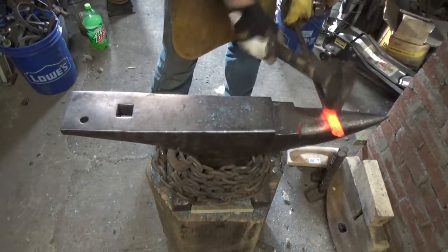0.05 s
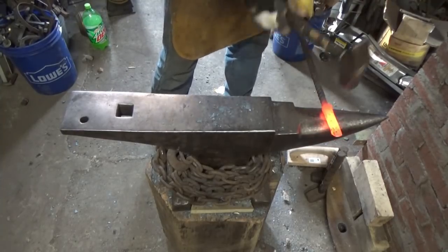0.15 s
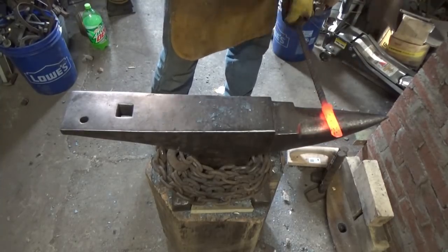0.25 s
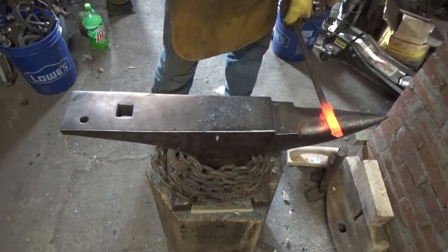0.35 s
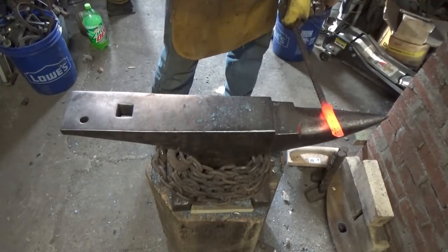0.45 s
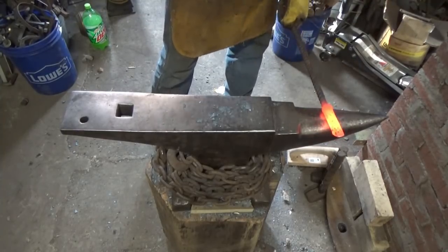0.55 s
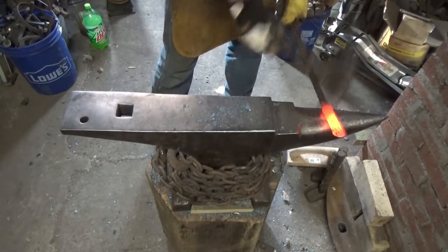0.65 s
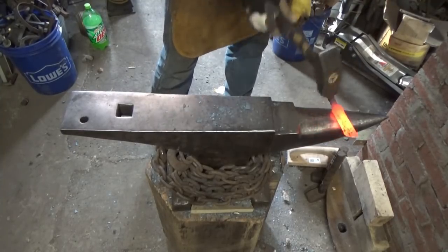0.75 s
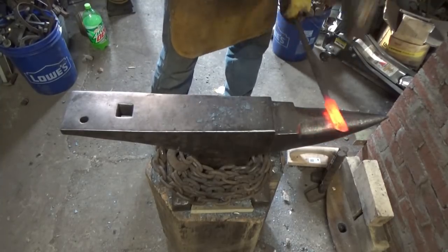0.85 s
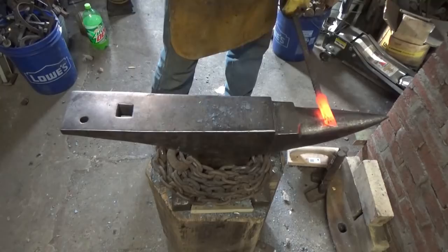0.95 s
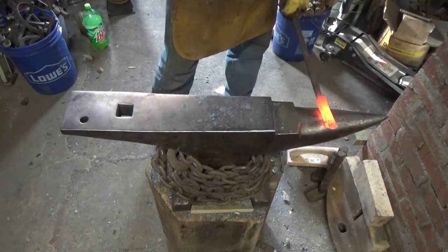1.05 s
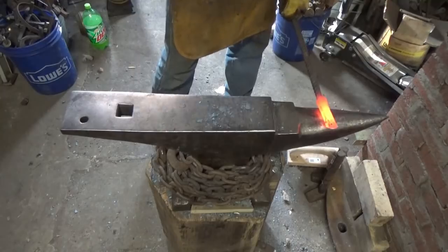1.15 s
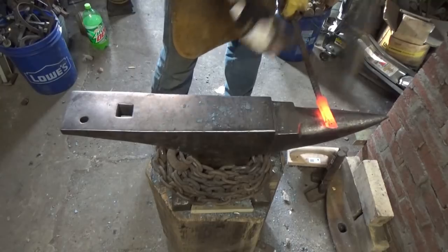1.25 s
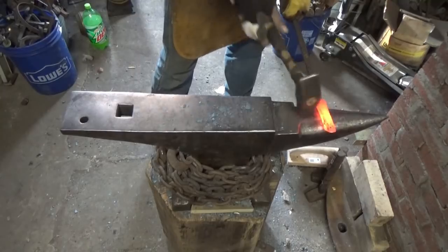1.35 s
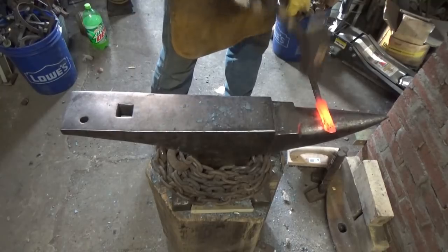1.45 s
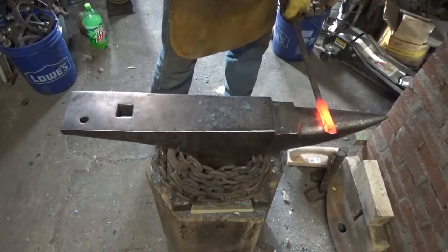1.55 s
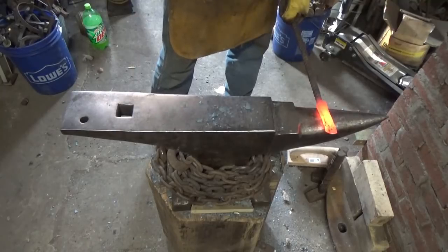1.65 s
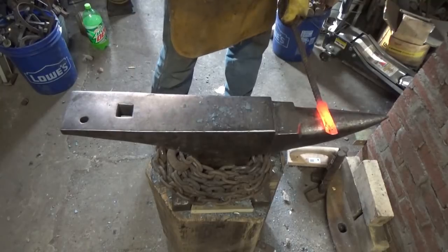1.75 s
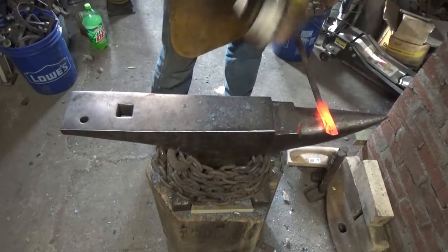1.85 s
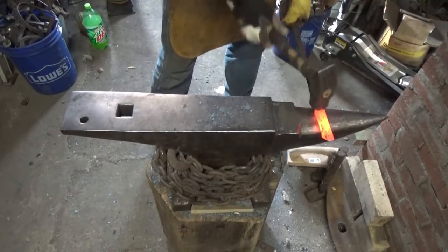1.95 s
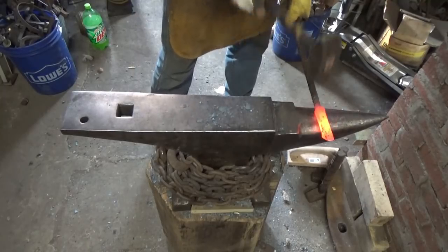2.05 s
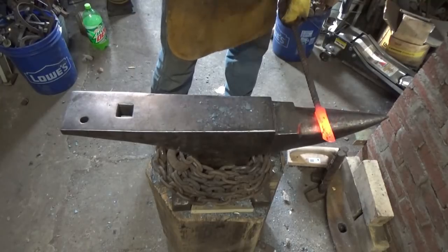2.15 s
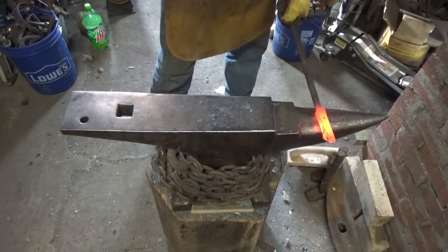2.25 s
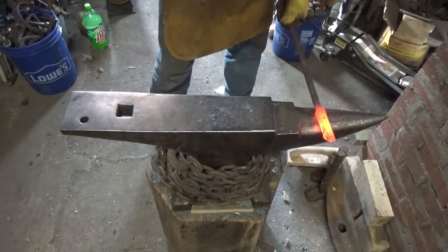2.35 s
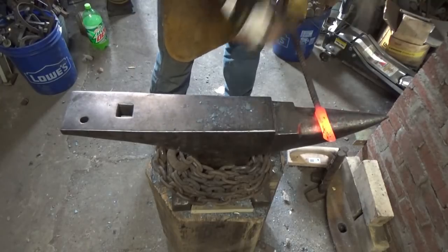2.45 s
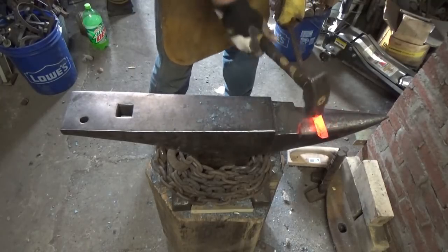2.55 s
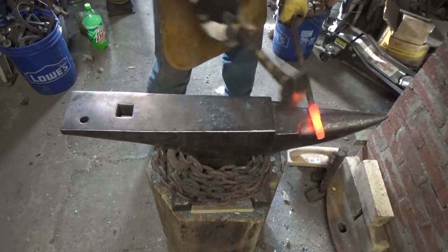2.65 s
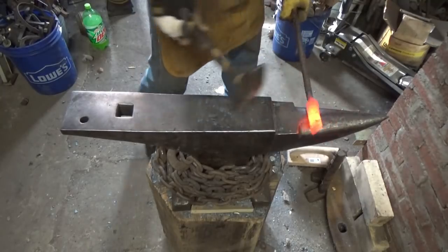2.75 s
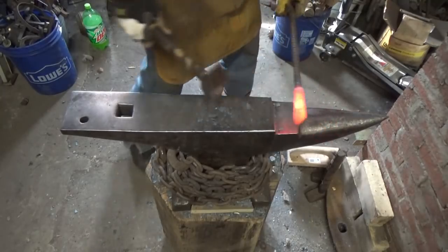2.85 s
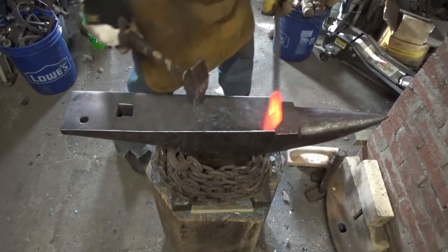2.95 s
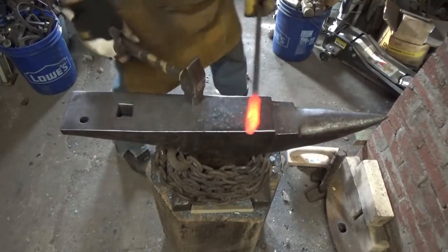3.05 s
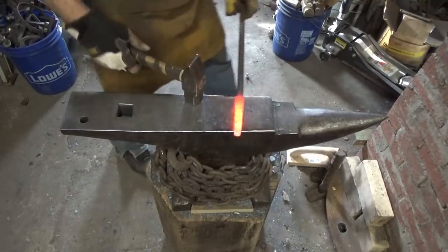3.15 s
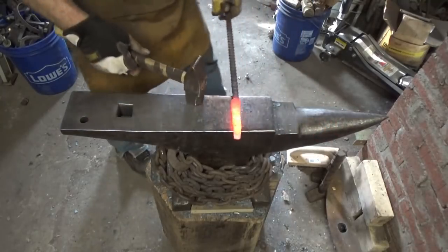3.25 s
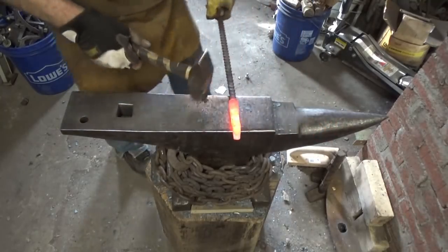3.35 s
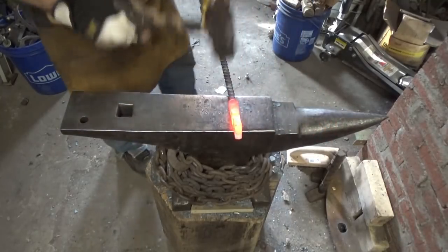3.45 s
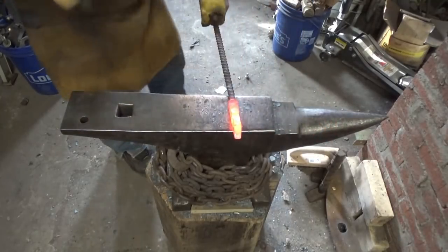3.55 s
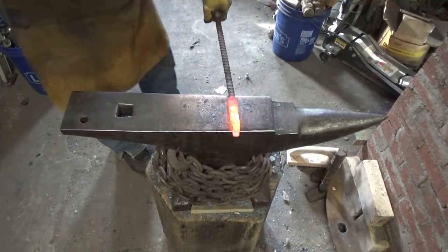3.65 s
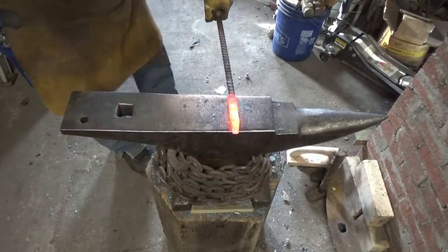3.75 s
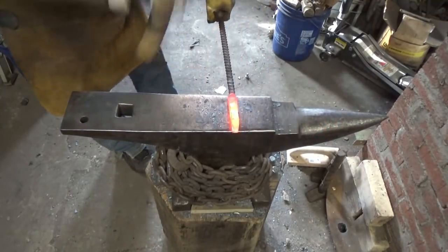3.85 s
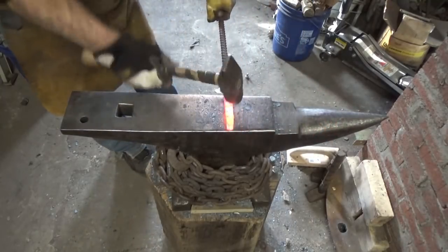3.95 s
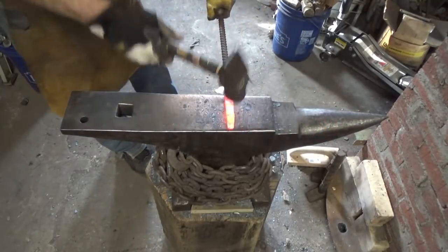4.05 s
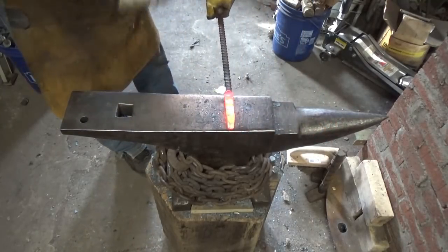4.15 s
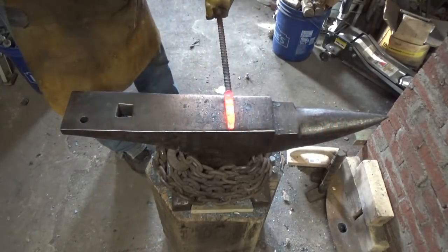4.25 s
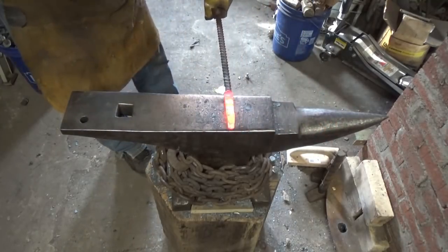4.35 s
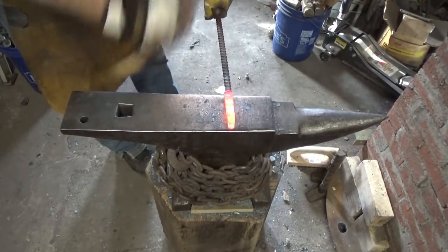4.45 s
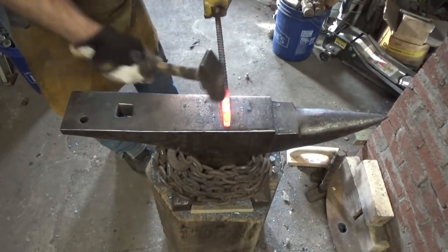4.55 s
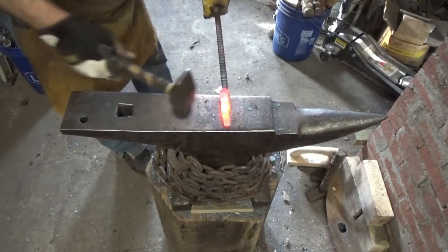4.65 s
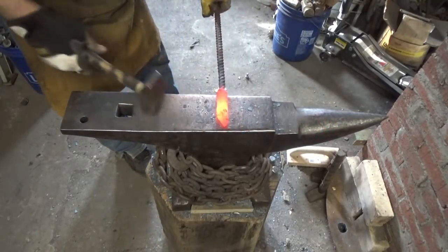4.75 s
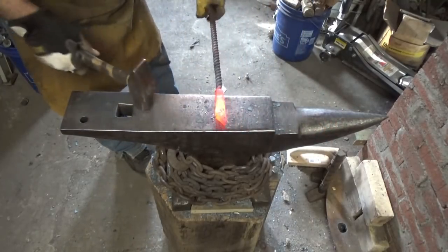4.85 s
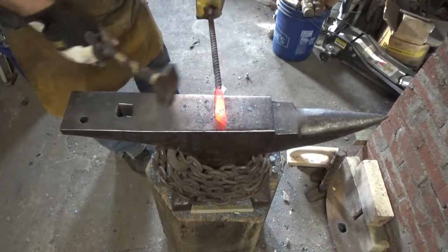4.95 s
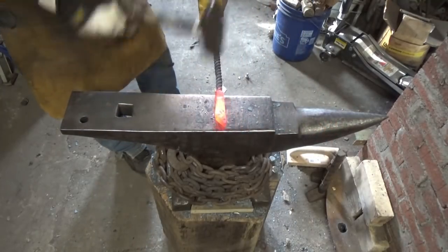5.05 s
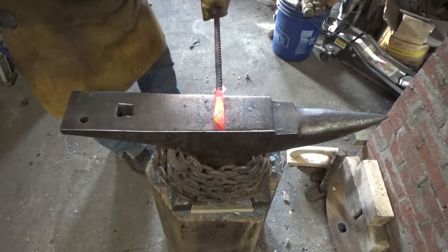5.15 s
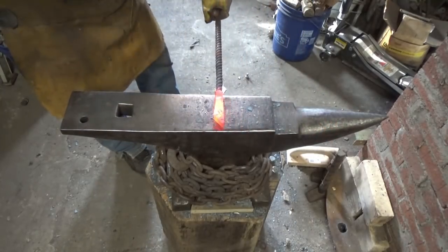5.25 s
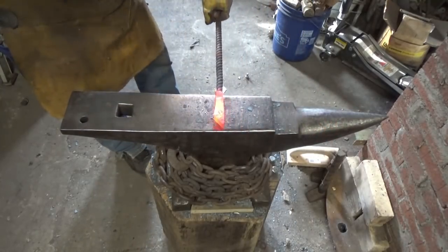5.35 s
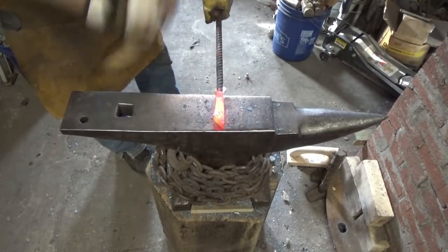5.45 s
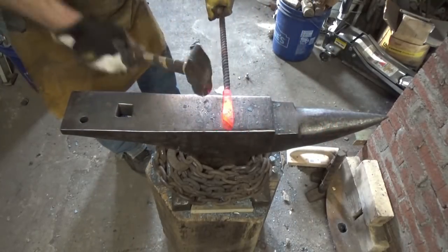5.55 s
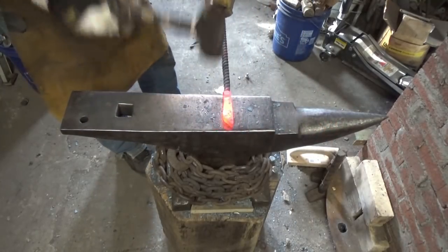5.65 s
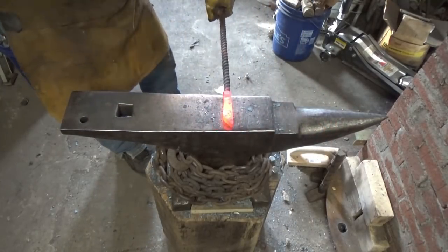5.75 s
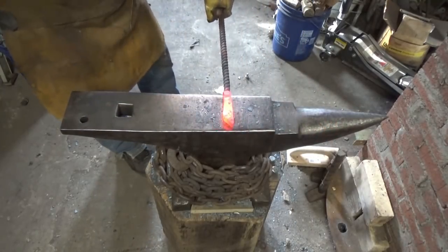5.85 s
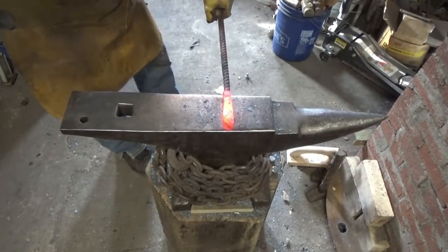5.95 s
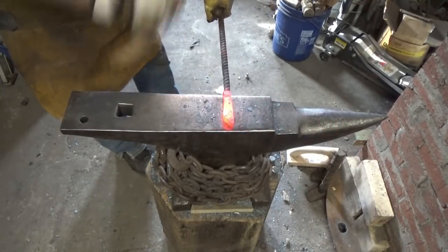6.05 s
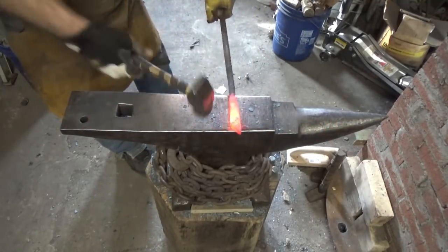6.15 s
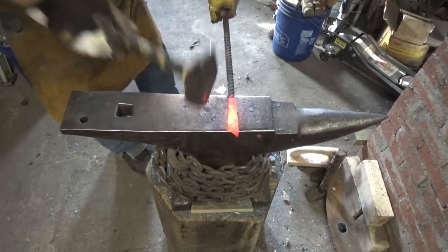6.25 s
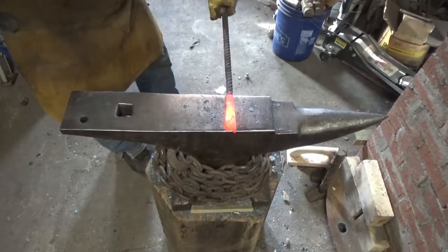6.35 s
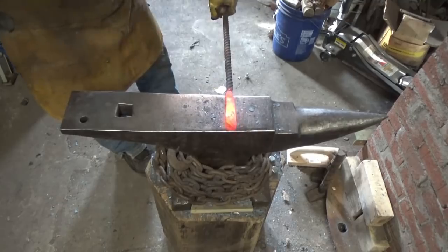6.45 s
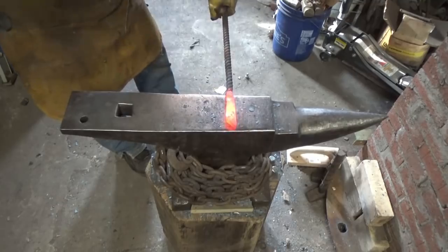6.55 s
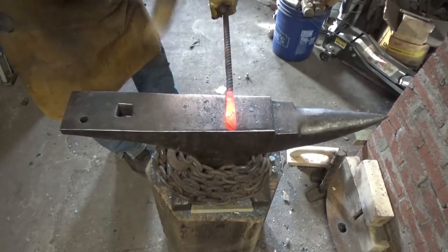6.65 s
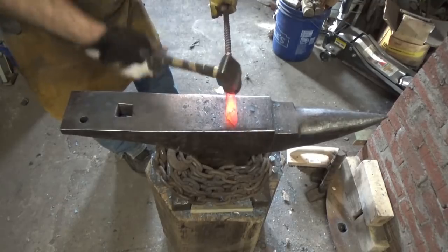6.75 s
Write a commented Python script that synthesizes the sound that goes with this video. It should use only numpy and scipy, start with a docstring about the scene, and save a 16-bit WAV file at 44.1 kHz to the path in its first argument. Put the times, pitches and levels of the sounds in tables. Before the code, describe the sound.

In a softly rushing workshop, a hammer lands five heavy blows on a hot bar, about 0.6 seconds apart, each a hard crack and short anvil ring. The hammer bounces lightly on the bare anvil, the bar clinks down and scrapes, then five more blows follow with another bounce among them. Close stereo microphone, short room reverberation, loud hits compressed.

```python
"""In a softly rushing workshop a smith strikes a hot bar six times on the anvil's horn, then four times on its face.
Each blow is a noise crack, a cluster of short steel modes and the anvil's damped modes; faint scale ticks are bursts.
After the fifth and seventh blows the hammer bounces on the bare face: clicks that excite the modes of anvil and head.
After the first bounces the bar is set down (ringing modes) and dragged (rough noise through resonances).
Decaying noise is the room's reverberation; a limiter ducks the loud sounds and lets the ring swell back."""
import sys
import numpy as np
from scipy import signal
from scipy.fft import rfft, irfft, next_fast_len
from scipy.io import wavfile
from scipy.ndimage import uniform_filter1d

SR = 44100
rng = np.random.default_rng(int(sys.argv[2]) if len(sys.argv) > 2 else 0)


def materialize(psi):
    """Save the field psi as 16-bit PCM at rate SR to the path in sys.argv[1].

    A 1-D psi becomes a single channel; in a 2-D psi each row is a channel.
    """
    bounded = np.clip(np.atleast_2d(psi).T, -1, 1)
    quanta = np.round(bounded * 32767).astype(np.int16)
    wavfile.write(sys.argv[1], SR, quanta)


N = 300479
T = np.arange(SR) / SR  # the second that follows a contact

# The anvil's mode frequencies in Hz; close neighbours beat against each other.
ANVIL_MODE_HZ = [1036, 1044, 1053, 1466, 1473, 1491, 1523, 2573, 2619, 3381, 3407, 4603, 4959, 5048, 5812,
                 6153, 6320, 6665, 7108, 7675, 7886, 7951, 8782, 9462, 10034, 10411, 11060, 11840, 14104]
# The anvil's modes in the same order. Each row: t60 in seconds, level in dB struck on the horn,
# level in dB struck on the face, level in dB under a light bounce.
ANVIL_MODES = [(0.19, -4, -7, -20.5), (0.24, 2, 3.5, 8), (0.41, -9.5, -10.5, -23.5), (0.42, -8.5, -19, -12),
               (0.6, -19, -23, -24), (0.42, -9.5, -20, -34.5), (0.58, -18, -31, -36), (.4, -27, -32.5, -22),
               (0.21, -16, -6.5, -30.5), (0.44, -31.5, -23, -22), (0.29, -29, -19.5, -23),
               (0.23, -30.5, -28.5, -36), (0.086, -7.5, -26, -7.5), (0.57, -16, -20, -5.5),
               (0.069, -26, -17.5, -12.5), (0.11, -29.5, -21, -32), (0.36, -27.5, -25, -20.5),
               (0.23, -17.5, -18.5, -15), (0.11, -28.5, -26, -39), (0.23, -29, -16.5, -13.5),
               (0.24, -29, -17.5, -26), (0.29, -20.5, -10.5, -15.5), (0.34, -20.5, -16, -19.5),
               (0.33, -22, -14.5, -35.5), (0.54, -28, -27.5, -27.5), (0.66, -27.5, -25, -35.5),
               (0.27, -30, -35, -32.5), (0.15, -33.5, -26.5, -28), (1.2, -54, -49.5, -55)]
# Spectrum of a light click of steel on steel. Each row: frequency in Hz, density in dB.
CLICK_COLOUR = [(60, -28), (230, 5), (800, -4), (1600, 5), (3300, 4.5), (5200, -2), (6500, -10.5),
                (10000, -6.5), (12500, -26.5), (16000, -47.5)]


def amp(db):
    """Level to amplitude ratio: 20 dB is a factor of ten."""
    return 10 ** (np.asarray(db) / 20)


def unit(x):
    """Normalisation to a root-mean-square value of 1."""
    return x / np.sqrt(np.mean(x ** 2) + 1e-20)


def along(points, hz):
    """Linear interpolation of (Hz, value) points over a logarithmic frequency axis."""
    f, v = np.transpose(points)
    return np.interp(np.log(hz + 1), np.log(f + 1), v)


def filtered(x, response):
    """Linear filtering: the spectrum is multiplied by a response of frequency."""
    n = x.shape[-1]
    padded = next_fast_len(n + SR // 8)
    spectrum = rfft(x, padded) * response(np.fft.rfftfreq(padded, 1 / SR))
    return irfft(spectrum, padded)[..., :n]


def noise(colour, size):
    """Coloured noise: white noise shaped to a given spectrum, at rms 1."""
    return unit(filtered(rng.standard_normal(size), lambda hz: amp(along(colour, hz))))


def stereo(mid, side):
    """Diffuse-field coherence: two close microphones differ little in the bass."""
    # Each row: frequency in Hz, gain of the side signal in dB.
    width = [(100, -21.5), (250, -19), (600, -10.5), (1500, -7), (4000, -9.5), (9000, -8), (12000, -34.5)]
    side = filtered(side, lambda hz: amp(along(width, hz)))
    return np.array([mid + side, mid - side])


def shop(level_db=-57.5, rise_db_per_s=0.5):
    """Stationary coloured noise, the workshop's low rush, under a slowly growing gain."""
    # Spectrum of the rush. Each row: frequency in Hz, density in dB.
    rush_colour = [(12, -51.5), (20, -47), (44, -5.5), (171, -1), (202, -1), (282, -0.5), (382, -5),
                   (505, -2), (811, -6.5), (1500, -8), (1670, -15), (5850, -26.5), (11000, -30.5),
                   (15500, -46.5)]
    rush = stereo(noise(rush_colour, N), noise(rush_colour, N))
    return rush * amp(level_db + rise_db_per_s * np.arange(N) / SR)


def add(track, s, sound):
    """Superposition: a sound is mixed into the track from time s."""
    part = track[:, round(s * SR):][:, :sound.shape[-1]]
    part += sound[..., :part.shape[-1]]


def decay(t, t60):
    """Exponential decay, falling by 60 dB in t60 seconds."""
    return np.exp(-np.log(1000) * t / t60)


def ring(hz, t60, db):
    """Modal superposition: damped sines start at once, neighbours swinging in opposite directions."""
    hz, t60 = np.array(hz)[:, None], np.array(t60)[:, None]
    swing = amp(db) * (-1) ** np.arange(len(hz))
    return swing @ (decay(T, t60) * np.sin(2 * np.pi * hz * T))


def burst(colour, t60, rise_s=0.0013):
    """Impact noise: broadband energy rises rapidly and decays exponentially."""
    return noise(colour, SR) * decay(T, t60) * (1 - np.exp(-T / rise_s))


def room_tail(build_s=0.015):
    """Diffuse reverberation: noise builds up as the walls reply, then decays faster in the high treble."""
    # The room's absorption. Each row: frequency in Hz, t60 in seconds.
    room_t60 = [(60, 0.46), (150, 0.5), (500, 0.51), (1500, 0.43), (3500, 0.4), (7000, 0.31), (10000, 0.33),
                (15000, 0.039)]
    hz, t, z = signal.stft(rng.standard_normal((2, SR)), SR, nperseg=256)
    faded = z * decay(t, along(room_t60, hz)[:, None])
    tail = signal.istft(faded, SR, nperseg=256)[1][:, :SR]
    tail = tail * (1 - np.exp(-T / build_s))
    return stereo(*tail) / np.linalg.norm(tail[0])  # mid signal of energy 1


def in_room(x, wet_db):
    """Direct sound plus its convolution with the room's impulse response."""
    reverberation = signal.fftconvolve(x[None], room_tail(), axes=1)[:, :SR]
    return x + amp(wet_db) * reverberation


def contact(colour, t60, wet_db):
    """Impact noise with its diffuse field: a short burst and a room wash of the same colour."""
    direct = burst(colour, t60)
    wash = filtered(room_tail(), lambda hz: amp(along(colour, hz)))
    return direct + amp(wet_db) * wash * np.linalg.norm(direct) / np.linalg.norm(wash[0])


def tilted(colour, above_hz, db):
    """Spectral tilt: the points of a colour above a frequency shift in level."""
    return [(f, level + db * (f > above_hz)) for f, level in colour]


def clang(low_hz=1600, high_hz=10500, t60=0.054, spread_db=3, count=44):
    """Dense modal response: random short modes swell while the surfaces press together."""
    hz = rng.uniform(low_hz, high_hz, count)
    life = t60 * rng.uniform(0.5, 1.5, count)
    levels = spread_db * rng.standard_normal(count)
    press = 1 - np.exp(-T / 0.002)
    return press * ring(hz, life, levels) / np.linalg.norm(amp(levels))


def blows(ring_db=-1, crack_db=-1, clang_db=0, crack_t60=0.05, crack_wet_db=0, scatter_db=1,
          left_db=0.5, lean_db=-3, lean_scatter_db=2):
    """Modal excitation: a heavy blow cracks, clangs and rings the modes that its place favours."""
    # Each row: start in seconds, force in dB, place (face above 0.5, else horn), crack in dB,
    # impact treble in dB, then four ring levels in dB, one near each of ring_hz.
    blow_rows = [(0.1383, 1.5, -6.5, -1.5, 1.5, -2.5, -8.5, -3.5, -7),
                 (0.75, -2, -6.5, 0.95, 0, -15.5, -2, -0.5, -5),
                 (1.3598, -1.5, 0, -1, -4.5, -1, -2, -3, -1.5),
                 (1.9761, -0.5, 0.5, -2.3, -4, 2.5, -2.5, -9.5, -9),
                 (2.5784, -1.5, 0, 0, 0, 6.5, 5.5, -3, 7.5),
                 (4.0135, -5.5, 0, 3.1, 1.5, 9, -0.5, -8.5, 2.5),
                 (4.5890, -5, 1, 4.5, 4.5, -2.5, 2.5, 6.5, 7),
                 (5.5890, -3, 1, -0.62, 0, 5.5, 8.5, -5, -10.5), (6.1910, -4, 1, 1, -1, -22, 0.5, 2.5, 4),
                 (6.8110, -14.5, 1, 2, 0.5, -6, 6.5, 8, 2.5)]
    # Centres of the four ring levels in Hz.
    ring_hz = [3400, 5049, 7951, 10411]
    # Spectrum of the crack. Each row: frequency in Hz, density in dB.
    crack_colour = [(25, -20), (80, -11), (140, -1), (300, -3.5), (700, -1), (1700, 1), (3000, -1.5),
                    (4300, -3.5), (6500, -3), (9500, -8.5), (11000, -11), (13000, -16.5), (16000, -28.5)]
    out = np.zeros((2, N))
    hz = np.array(ANVIL_MODE_HZ)
    t60, horn_db, face_db, _ = np.transpose(ANVIL_MODES)
    for s, force_db, place, sharp_db, treble_db, *colour_db in blow_rows:
        place_db = face_db if place > 0.5 else horn_db
        levels = place_db + np.interp(hz, ring_hz, colour_db) * (hz > 3000)
        levels = levels + scatter_db * rng.standard_normal(len(hz))
        tones = in_room(ring(hz, t60, levels), wet_db=-17)

        # each mode radiates its own pattern, so it reaches the two microphones unequally
        lean_levels = levels + lean_db + lean_scatter_db * rng.standard_normal(len(hz))
        lean = ring(hz, t60, lean_levels)
        quarter_turned = np.imag(signal.hilbert(lean, 2 * SR))[:SR]
        tones = tones + stereo(0, quarter_turned)
        tones = tones * amp([[left_db], [-left_db]])

        crack = contact(tilted(crack_colour, 3600, treble_db), crack_t60, crack_wet_db)
        cluster = in_room(clang(), wet_db=-7.5)
        impact = amp(crack_db) * crack + amp(clang_db + treble_db) * cluster
        add(out, s, amp(force_db + ring_db) * tones + amp(force_db + sharp_db) * impact)
    return out


def scale_ticks(level_db=7):
    """Impulsive radiation: tiny bright noise bursts, as of cooling scale flaking off."""
    # Each row: start in seconds, relative level in dB.
    tick_rows = [(1.147, -35.5), (1.1948, -39), (1.275, -53.5), (2.3207, -39.5), (5.4152, -32),
                 (5.5404, -41), (6.0494, -53)]
    # Spectrum of a tick. Each row: frequency in Hz, density in dB.
    flake_colour = [(1000, -9.5), (4000, -3.5), (10000, 13.5), (16000, -13)]
    out = np.zeros((2, N))
    for s, db in tick_rows:
        tick = in_room(burst(flake_colour, t60=0.0022), wet_db=-10.5)
        add(out, s, amp(db + level_db) * tick)
    return out


def bounces(click_db=-11, anvil_db=-22, head_db=-19, damping=0.63):
    """Modal damping: a bounce clicks and rings head and anvil, whose low modes the contacts cut short."""
    # Each row: start in seconds, click in dB, low anvil ring in dB, hammer head ring in dB,
    # click treble in dB.
    bounce_rows = [(2.8553, -4.5, -6, -14.5, 3), (2.9281, -6.5, -8, -31.5, -4),
                   (2.9819, -9.5, -13.5, -29.5, -5), (3.0220, -13.5, -14.5, -41, -1),
                   (4.8414, -2, -13.5, 5, -3), (4.9160, -1, -8, 3.5, 3), (4.9626, -2.5, -18, -3, -0.5),
                   (5.0085, -8.5, -23.5, -6, -9)]
    # The head's mode frequencies in Hz.
    head_hz = [2300, 2588, 2612, 4850, 5190, 8750]
    # The head's modes in the same order. Each row: t60 in seconds, level in dB.
    head_modes = [(.1, -20.5), (0.25, -8), (0.063, 10.5), (0.14, -9.5), (0.12, -11), (0.15, -19.5)]
    out = np.zeros((2, N))
    low = np.array(ANVIL_MODE_HZ) < 4000
    t60, _, _, light_db = np.transpose(ANVIL_MODES)
    t60 = t60 * np.where(low, damping, 1)
    for s, db, body_db, ping_db, treble_db in bounce_rows:
        click = contact(tilted(CLICK_COLOUR, 6000, treble_db), t60=0.041, wet_db=-6.5)
        # the high modes follow the click; the low ones depend on where the hammer lands
        levels = light_db + np.where(low, body_db, db - 4.5)
        body = amp(anvil_db) * ring(ANVIL_MODE_HZ, t60, levels)
        ping = amp(head_db + ping_db) * ring(head_hz, *np.transpose(head_modes))
        tones = in_room(body + ping, wet_db=-11)
        add(out, s, amp(click_db + db) * click + tones)
    return out


def bar_knocks(ring_db=-33, clang_db=-27, click_db=-29):
    """Modes of a struck bar: it is set down, trips as it slides, or jumps under a blow and falls back."""
    # Each row: start in seconds, relative level in dB.
    knock_rows = [(3.0854, 0), (3.157, -8), (3.2189, -8.5), (3.3744, -7.5), (3.533, -11), (6.2490, 13)]
    # Modes of the bar's cold shank. Each row: frequency in Hz, t60 in seconds, level in dB.
    bar_modes = [(1314, .2, -11), (2110, .13, 0), (2929, .13, -4), (3957, .13, -5), (4640, .1, -9),
                 (6901, .15, -20)]
    out = np.zeros((2, N))
    for s, db in knock_rows:
        cluster = clang(low_hz=3600, high_hz=6500, t60=0.075, count=14)
        tones = amp(ring_db) * ring(*np.transpose(bar_modes)) + amp(clang_db) * cluster
        click = contact(CLICK_COLOUR, t60=0.06, wet_db=-6)
        add(out, s, amp(db) * (in_room(tones, wet_db=-14.5) + amp(click_db) * click))
    return out


def stroke(start, length, attack_s=0.057, sag_db_per_s=13, release_db_per_s=148.5):
    """Sliding envelope: a stroke gathers speed, eases off and stops."""
    age = np.maximum(np.arange(N) / SR - start, 0)
    fade_db = sag_db_per_s * age + release_db_per_s * np.maximum(age - length, 0)
    return np.minimum(age / attack_s, 1) * amp(-fade_db)


def drag(grit_db=2, grit_rate_hz=220, modes_db=-2):
    """Friction excitation: rough scale catches and slips on the face, driving narrow steel resonances."""
    # Each row: start in seconds, length in seconds, pressure in dB.
    slide_rows = [(3.134, .07, -41.5), (3.2, .06, -41), (3.324, .35, -37), (3.73, 0.21, -60),
                  (3.951, 0.12, -42)]
    # Spectrum of the rubbing. Each row: frequency in Hz, density in dB.
    rub_colour = [(88, -27.5), (150, -32.5), (169, 5), (205, -8), (326, 2.5), (631, -3), (695, 3),
                  (844, 5.5), (966, 4), (2100, 0.5), (2410, -3), (7860, -9), (15500, -32)]
    # Resonances of the steel. Each row: frequency in Hz, width in Hz, relative gain in dB.
    slide_modes = [(787, 660, -17), (3264, 39, 4), (4630, 51, -3.5), (4800, 29, 2), (5500, 68, -10),
                   (6700, 56, -32)]

    def steel(f):
        """Resonance: direct transmission plus a band-pass peak for each mode."""
        peaks = sum(amp(gain_db) * 1j * f * width / (centre ** 2 - f ** 2 + 1j * f * width)
                    for centre, width, gain_db in slide_modes)
        return 1 + amp(modes_db) * peaks

    t = np.arange(N) / SR
    roughness = np.interp(t * grit_rate_hz, np.arange(N), rng.standard_normal(N))
    catches = amp(grit_db * roughness)
    rub = [unit(filtered(catches * noise(rub_colour, N), steel)) for _ in range(2)]
    pressure = sum(amp(db) * stroke(s, length) for s, length, db in slide_rows)
    return stereo(*rub) * pressure


def scene():
    """Superposition of all the sources in the workshop."""
    return shop() + blows() + scale_ticks() + bounces() + bar_knocks() + drag()


def limiter(x, ceiling_db=-13.0, release_db_per_s=170, attack_s=0.0013):
    """Gain control: the gain ducks quickly under a loud sound, then climbs at a steady rate in dB."""
    power = np.abs(uniform_filter1d(np.mean(x ** 2, axis=0), size=128))
    over_db = np.maximum(10 * np.log10(power + 1e-12) - ceiling_db, 0)
    # the running maximum holds the deepest duck while the climb pays it back
    climb_db = release_db_per_s * np.arange(N) / SR
    gain_db = climb_db - np.maximum.accumulate(over_db + climb_db)
    keep = np.exp(-1 / (attack_s * SR))
    return x * amp(signal.lfilter([1 - keep], [1, -keep], gain_db))


def record(dry):
    """Saturation and band limiting: onsets slip past the limiter, bend softly and lose the top treble."""
    x = limiter(dry)
    top, band_limit_hz = 0.62, 16000  # top: the amplitude that saturation approaches
    saturated = x / (1 + (x / top) ** 4) ** (1 / 4)
    return filtered(saturated, lambda hz: hz < band_limit_hz)


dry = scene()
out = record(dry)
materialize(out)
```